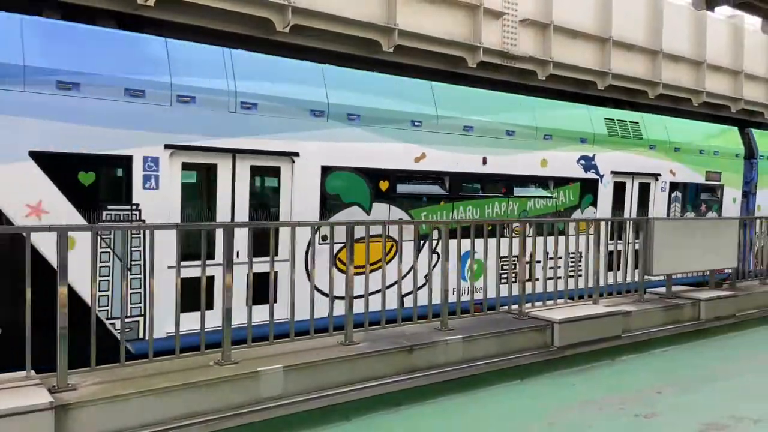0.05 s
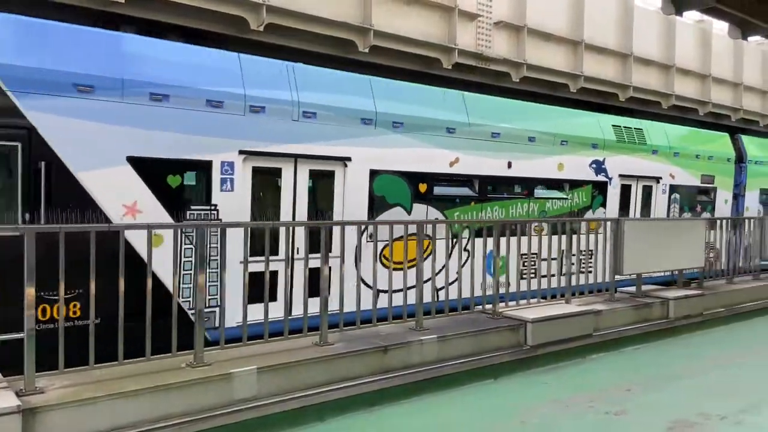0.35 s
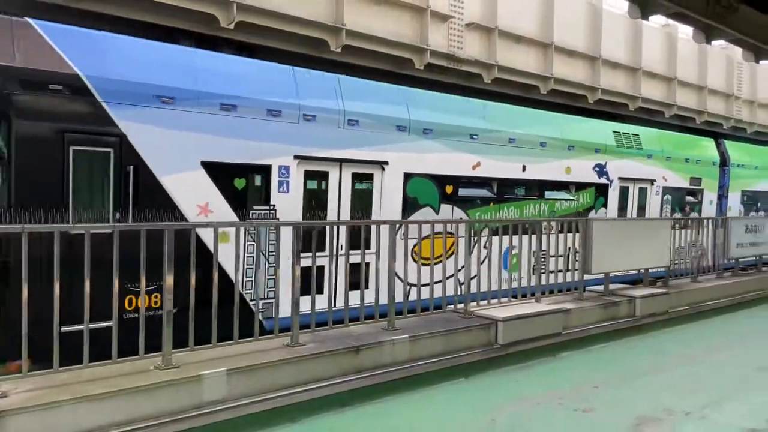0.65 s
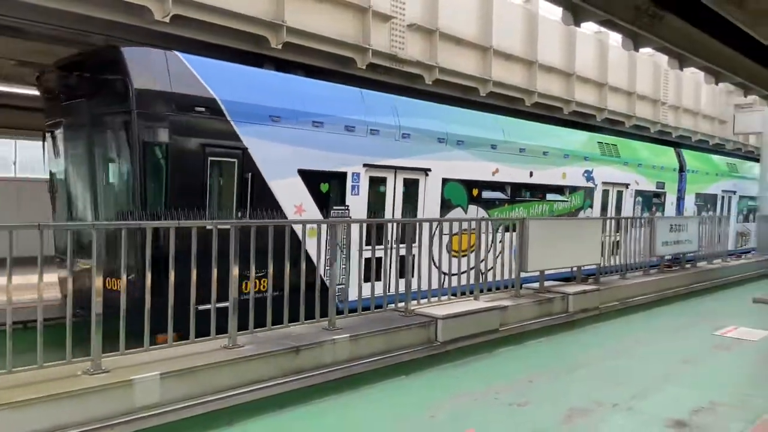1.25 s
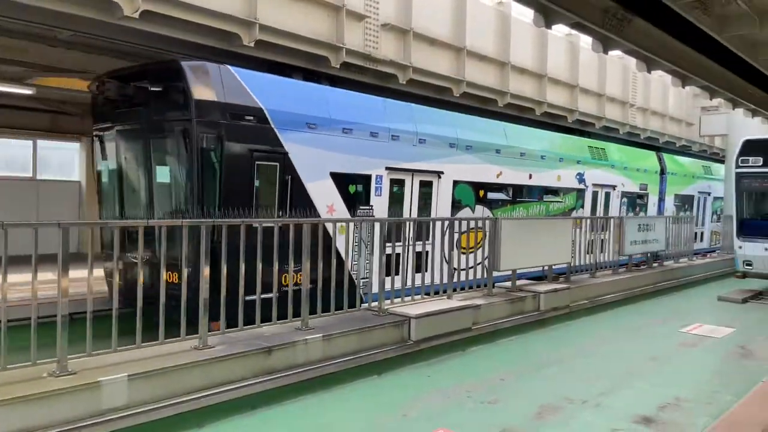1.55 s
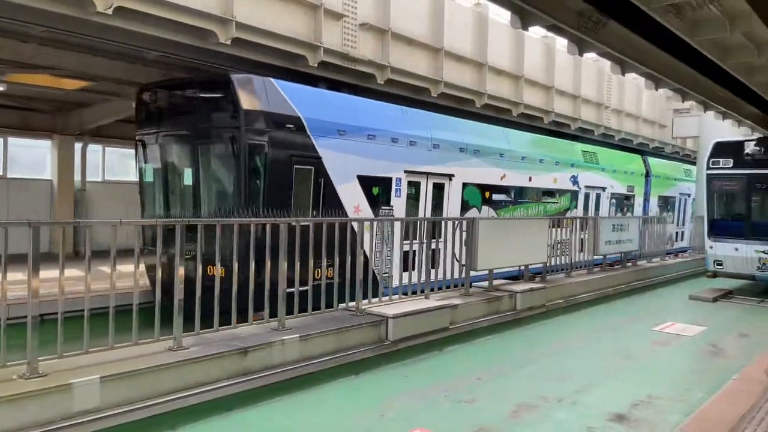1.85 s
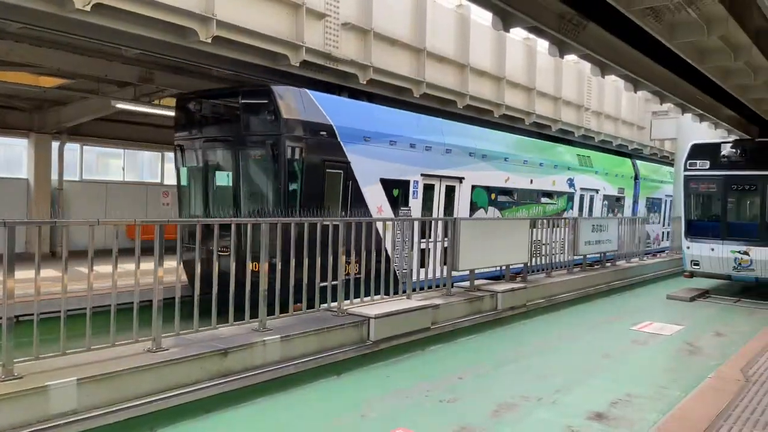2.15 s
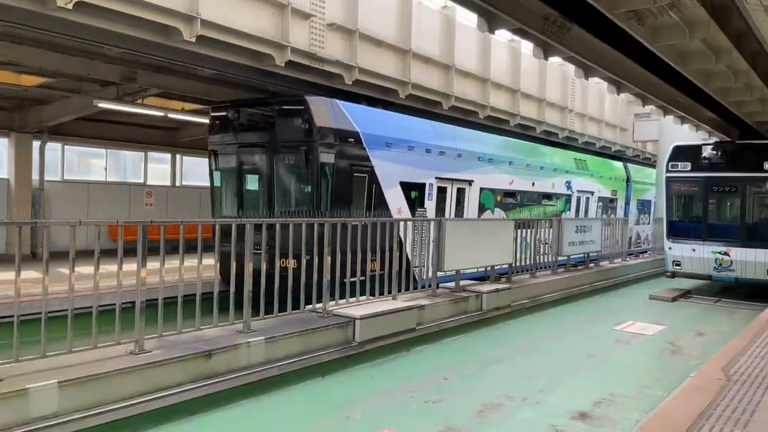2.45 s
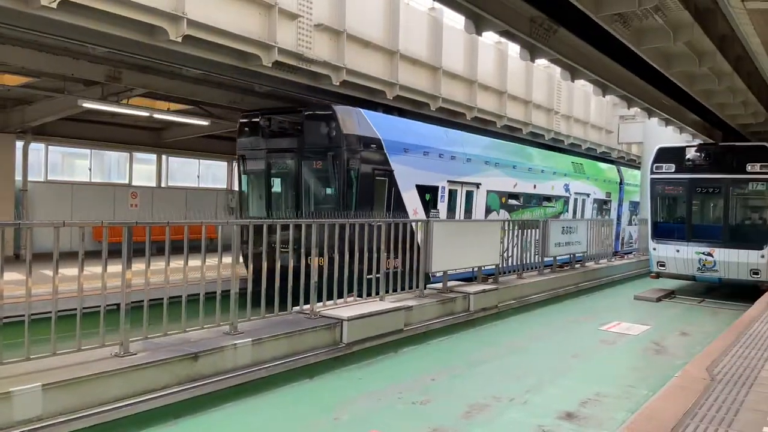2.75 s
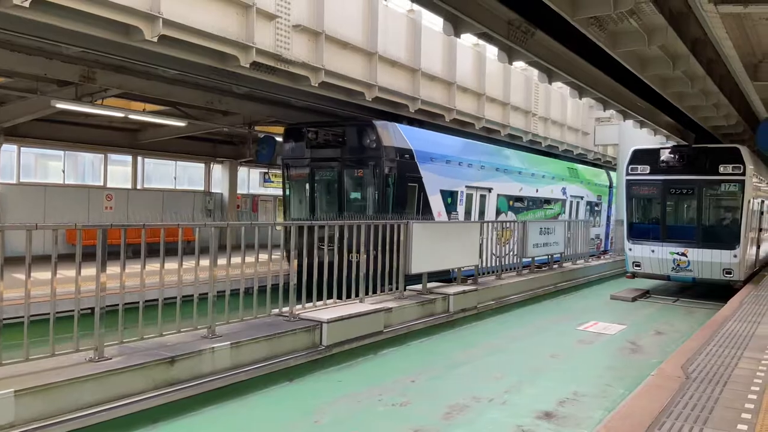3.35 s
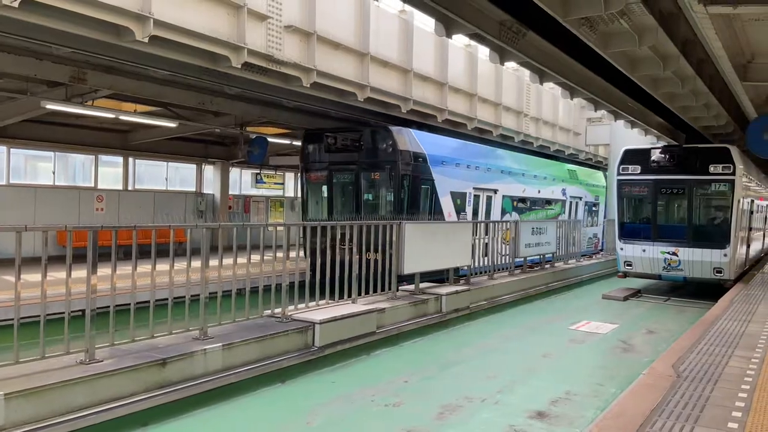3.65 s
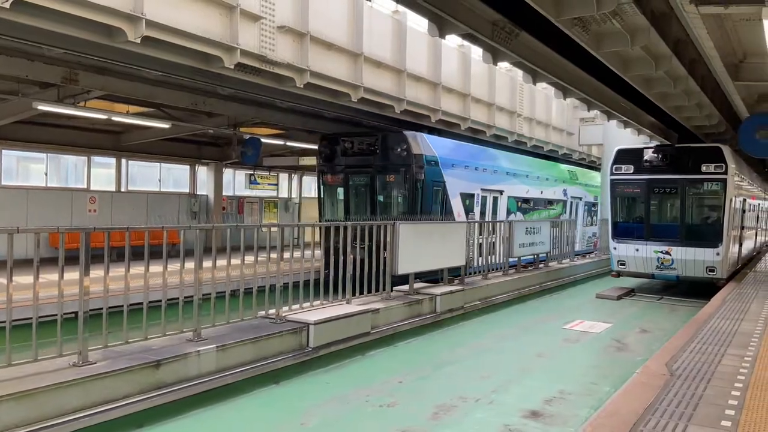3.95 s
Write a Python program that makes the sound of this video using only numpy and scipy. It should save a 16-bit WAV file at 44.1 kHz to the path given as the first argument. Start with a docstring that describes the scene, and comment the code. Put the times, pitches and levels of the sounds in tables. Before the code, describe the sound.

A suspended monorail rumbles through a roofed station, with irregular low tyre thuds, a humming girder and a faint electric buzz. Faint air puffs come around 0.5 seconds. From about 1 second, as the tail passes, the roar grows and a rough, ringing metallic hiss emerges. A gear whine enters with it and sinks steadily as the train slows, the rumble easing slightly by 4 seconds.

```python
"""Tyres rumble and thud in a steel girder overhead: a suspended monorail slows into a roofed station.
The gear whine sinks with the speed and the inverter buzzes faintly.
Once the tail has passed, a rough ringing hiss comes out from behind it,
likely the collector shoes rubbing on the power rail."""
import sys
import numpy as np
from scipy import signal
from scipy.fft import rfft, irfft
from scipy.io import wavfile

SR = 44100
rng = np.random.default_rng(int(sys.argv[2]) if len(sys.argv) > 2 else 0)


def put_to_file(sound):
    """Save the sound as 16-bit audio at rate SR, in the file named by the first command-line argument."""
    columns = np.atleast_2d(sound).T  # one column per channel
    safe = np.clip(columns, -1, 1)
    whole_steps = np.round(safe * 32767)
    wavfile.write(sys.argv[1], SR, whole_steps.astype(np.int16))


N = 176400
T, HZ = np.arange(N) / SR, np.fft.rfftfreq(N, 1 / SR)

# running gear exposed behind the tail: t/s, gain/dB
EXPOSURE = [(0, -19.5), (.72, -22), (.92, -12.5), (1.12, -4.5), (1.5, -2.5), (2.1, 0), (2.6, -2), (3.3, 0),
            (4, -0.6)]
# lead of the left ear: f/Hz, lead/s
LEFT_LEAD = [(60, .0004), (130, .0001), (370, 0), (460, .00047), (580, .0007), (800, .00053),
             (1100, .00047), (1500, .0004), (2700, .00046), (8500, .00044)]


def amp(db):
    """Decibels to gain."""
    return 10 ** (np.asarray(db) / 20)


def unit(x):
    """Scale to rms 1."""
    return x / np.sqrt(np.mean(abs(x) ** 2) + 1e-30)


def curve(rows, column=1):
    """One column of a time table, per sample."""
    rows = np.array(rows)
    return np.interp(T, rows[:, 0], rows[:, column])


def at_hz(rows, hz):
    """Frequency table, interpolated on a log axis."""
    f, value = np.transpose(rows)
    return np.interp(np.log(hz + 1), np.log(f + 1), value)


def colour(rows):
    """Gain per frequency bin from a dB table."""
    return amp(at_hz(rows, HZ))


def peak(hz, width_hz):
    """Gain of a steep resonance."""
    return 1 / (1 + (2 * (HZ - hz) / width_hz) ** 2)


def waver(rate_hz):
    """Slow random motion, rms 1."""
    spectrum = rfft(rng.standard_normal(N)) * (HZ > 0)
    return unit(irfft(spectrum / (1 + (HZ / rate_hz) ** 4), N))


def burst(start_s, rise_s, fall_s):
    """Quadratic rise, exponential fall."""
    age = T - start_s
    return np.clip(age / rise_s, 0, 1) ** 2 * np.exp(-np.maximum(age - rise_s, 0) / fall_s)


def hall_noise(shape):
    """Shaped noise in the station: coherent in the bass, diffuse above, left ear first."""
    # likeness of the ears: f/Hz, coherence/0-1
    coherence = [(90, .95), (150, .9), (200, .68), (260, .57), (330, .65), (460, .46), (580, .55),
                 (730, .17), (1100, .45), (1550, .2), (4500, .1), (7000, .2), (9000, .35), (15000, .2)]
    # left minus right: f/Hz, level/dB
    balance = [(60, 1.5), (130, 0.5), (290, 1.5), (640, 4), (1410, 1), (3100, 2.0), (6820, 2),
               (15000, -1.5)]
    left, diffuse = rfft(rng.standard_normal((2, N))) * shape
    alike = np.clip(at_hz(coherence, HZ), 0, .99)
    lag = np.exp(-2j * np.pi * HZ * at_hz(LEFT_LEAD, HZ))
    right = (alike * left + np.sqrt(1 - alike ** 2) * diffuse) * lag
    lean = np.sqrt(colour(balance))
    mid_gain = np.sqrt((1 + alike * lag.real) / 2)
    return irfft([left * lean / mid_gain, right / lean / mid_gain], N) / np.std(irfft(left, N))


def ring(modes):
    """Resonances driven by random friction."""
    return sum(amp(db) * hall_noise(peak(hz, width_hz)) for hz, width_hz, db in modes)


def tone(hz, width_hz, direct):
    """Sine with power share `direct`, plus echoes scattered differently to each ear."""
    scatter = np.array([unit(waver(width_hz / 2) + 1j * waver(width_hz / 2)) for _ in range(2)])
    envelope = np.sqrt(direct) + np.sqrt(1 - direct) * scatter
    left_turns = np.cumsum(hz * np.ones(N)) / SR + rng.random()
    turns = np.array([left_turns, left_turns - hz * at_hz(LEFT_LEAD, hz)])
    return np.sqrt(2) * (envelope * np.exp(2j * np.pi * turns)).real


def station_fizz():
    """Faint, steady, distant treble noise."""
    # fizz spectrum: f/Hz, relative density/dB
    spectrum = [(7000, -13), (8500, -26), (9600, 0), (11000, 11), (12000, -0.5), (13500, -5.5), (15500, -3)]
    return amp(-69.5) * hall_noise(colour(spectrum))


def air_puffs():
    """Brief hisses, likely from the air brakes."""
    # puffs: t/s, level/dB, rise/s, fall/s
    puffs = [(.355, -57, 0.019, 0.051), (.45, -61, 0.057, 0.088), (.52, -55.5, 0.058, 0.052)]
    # escaping air: f/Hz, relative density/dB
    spectrum = [(2000, -18), (4500, 14), (6800, 7), (9000, -2), (11500, 5), (15500, -14)]
    envelope = sum(amp(db) * burst(start_s, rise_s, fall_s) for start_s, db, rise_s, fall_s in puffs)
    return envelope * hall_noise(colour(spectrum))


def inverter():
    """Steady buzz of the power electronics."""
    # harmonics: f/Hz, relative level/dB
    harmonics = [(2880, -74), (3117, -73), (3241, -71), (3601, -73), (4081, -73), (4317, -71), (4678, -75),
                 (4802, -76), (5281, -78)]
    return amp(-2.5) * sum(amp(db) * tone(hz, width_hz=5.3, direct=0.62) for hz, db in harmonics)


def car_body():
    """The body resonates, fading as its tail passes."""
    # body modes: f/Hz, width/Hz, level/dB
    modes = [(76, 35, -48), (747, 43, -50.5), (863, 79, -50.5)]
    tail_s = 0.93
    return ring(modes) / np.hypot(1, (T / tail_s) ** 4)


def girder_hum():
    """The girder hums softly and surges as the tyres roll along it."""
    # surges: centre t/s, f/Hz, level/dB, Gaussian sigma/s
    surges = [(0.214, 315, -42.5, 0.024), (0.646, 308, -42.5, 0.06), (0.963, 305, -42, 0.031),
              (1.52, 321, -38.5, 0.13), (2.291, 306, -38, 0.045), (2.97, 303.3, -40, 0.12),
              (3.193, 305.6, -37, 0.029), (3.655, 320, -43, 0.092), (3.87, 320.7, -38.5, 0.03)]
    width_hz = 130
    hum = amp(-48.5) * tone(hz=311.2, width_hz=width_hz, direct=0)
    for centre_s, hz, db, sigma_s in surges:
        swell = np.exp(-((T - centre_s) / sigma_s) ** 2 / 2)
        hum += amp(db) * swell * tone(hz, width_hz, direct=0.73)
    return hum


def girder_roar():
    """The open girder booms behind the train; its walls ring throughout."""
    # boom and roar: f/Hz, relative density/dB
    spectrum = [(20, -30), (35, 0), (55, 5), (95, -22), (140, -3.5), (220, -1.5), (300, -4.5), (420, -7),
                (560, -13), (750, -5), (1100, -11), (1500, -20), (3000, -64)]
    # wall modes: f/Hz, width/Hz, level/dB
    wall_modes = [(355, 48, -51), (565, 5.7, -64.5)]
    return hall_noise(colour(spectrum)) * amp(-38.5 + curve(EXPOSURE)) + ring(wall_modes)


def gear_whine():
    """Meshing teeth; the pitch sinks with the speed."""
    # gear mesh: t/s, f/Hz, level/dB
    mesh = [(.8, 1020, -54), (1.04, 1018, -41.5), (1.13, 991, -45), (1.24, 1007, -38.5), (1.35, 1003, -49),
            (1.44, 992, -36), (1.85, 975, -39.5), (2.02, 940, -40.5), (2.1, 958, -43.5), (2.48, 914, -41),
            (2.62, 898, -34), (3.0, 855, -42), (3.38, 817, -37.5), (3.55, 804, -46), (3.7, 784, -41),
            (4, 747, -55)]
    return tone(curve(mesh), width_hz=42, direct=0.2) * amp(curve(mesh, column=2))


def tyre_bumps():
    """Low thuds on the running surface: a short knock over a rumbling tail."""
    # bumps: t/s, level/dB, f/Hz
    bumps = [(0.17, -33.5, 87), (0.562, -34, 88), (0.94, -34, 143), (1.222, -34, 79.7), (1.409, -37, 78.5),
             (2.001, -36, 78), (2.48, -33, 54.3), (2.748, -33, 59.5), (3.24, -34, 61)]
    rise_s = 0.015
    thuds = np.zeros((2, N))
    for start_s, db, hz in bumps:
        sine = np.sqrt(2) * np.sin(2 * np.pi * hz * (T - start_s))
        knock = amp(-4) * burst(start_s, rise_s, fall_s=0.014) * sine
        tail = burst(start_s, rise_s, fall_s=0.021) * hall_noise(peak(hz, width_hz=60))
        thuds += amp(db) * (knock + tail)
    return thuds


def tyre_rumble():
    """Broad rolling noise, easing as the train slows."""
    # tyres and station air: f/Hz, relative density/dB
    spectrum = [(18, -48), (30, -12), (76, 0), (104, -2), (146, -2), (195, -6.5), (245, -5), (311, -4),
                (367, -8.5), (433, -9), (800, -12.5), (859, -13.5), (944, -16), (1220, -17), (1550, -20.5),
                (2060, -20), (3380, -35), (4180, -32.5), (5050, -36), (7040, -41), (8500, -45),
                (11000, -95), (18700, -120)]
    # easing of the rumble: t/s, gain/dB
    easing = [(0, 1), (1.3, 0), (1.8, -0.5), (2.5, -0.5), (3.2, -1.5), (4, -2.5)]
    return hall_noise(colour(spectrum)) * amp(-36 + curve(easing) + 0.17 * waver(rate_hz=10))


def collector_shoes():
    """Sliding contacts hiss, sizzle and ring the rail; the pressure flutters, the pitch wanders."""
    # rubbing: f/Hz, relative density/dB
    rub_spectrum = [(900, -5), (1300, -8), (1850, -8.5), (2150, -5), (2750, -8.5), (3000, 5.5), (3500, 4.5),
                    (4200, -5.5), (4380, -6.5), (5100, -8), (5800, -14.5), (6600, -19), (7700, -18.5),
                    (9800, -27), (11500, -28.5), (15000, -57)]
    # rail modes: f/Hz, width/Hz, level/dB
    rail_modes = [(1574, 190, -38), (1554.5, 44, -43), (1594, 30, -43.5), (1885, 45, -58),
                  (2386, 170, -49.5), (3125, 240, -45.5), (3640, 83, -53), (3840, 130, -52.5),
                  (4150, 87, -54.5), (5100, 64, -72)]
    # swell of the ringing: t/s, gain/dB
    rail_swell = [(0, -33), (.75, -25), (1.02, -21), (1.15, -9), (1.42, -5.5), (1.55, -2.5), (1.85, -1.5),
                  (2.38, 0.5), (2.48, -1.5), (2.62, 1.5), (2.78, -3), (3.0, -1), (3.35, -2), (3.52, -2),
                  (3.62, -2), (3.75, -1), (4, -2)]
    # contact sizzle: f/Hz, width/Hz, relative level/dB
    sizzle_bands = [(8300, 960, -2), (8640, 7200, -7.5)]
    # swell of the sizzle: t/s, level/dB
    sizzle_swell = [(0, -93), (.72, -80), (.95, -65), (1.17, -73), (1.55, -59), (1.85, -59.5), (2.7, -60.5),
                    (3.5, -68), (4, -86)]
    rub_flutter_db, rail_flutter_db, sizzle_flutter_db = 0.74, 0.8, 1.6
    pitch_wander = 0.004054  # rms share of the pitch
    pressure = waver(rate_hz=14)
    rub = hall_noise(colour(rub_spectrum)) * amp(-41.5 + curve(EXPOSURE) + rub_flutter_db * pressure)
    warped_s = T + pitch_wander * np.cumsum(waver(rate_hz=9.4)) / SR
    rail = np.array([np.interp(warped_s, T, ear) for ear in ring(rail_modes)])
    rail *= amp(curve(rail_swell) + rail_flutter_db * pressure)
    sizzle = ring(sizzle_bands) * amp(curve(sizzle_swell) + sizzle_flutter_db * waver(rate_hz=18))
    return rub + rail + sizzle


def scene():
    """The train in the station, in stereo."""
    background = station_fizz() + air_puffs() + inverter()
    structure = car_body() + girder_hum() + girder_roar()
    return background + structure + gear_whine() + tyre_bumps() + tyre_rumble() + collector_shoes()


def record(dry):
    """Microphone bass roll-off and band limit."""
    low_hz, high_hz = 27, 15600
    highpass = signal.butter(4, low_hz, "highpass", fs=SR, output="sos")
    lowpass = signal.firwin(511, high_hz, window=("kaiser", 9), fs=SR)
    return signal.oaconvolve(signal.sosfilt(highpass, dry), lowpass[None], "same")


dry = scene()
out = record(dry)
put_to_file(out)
```